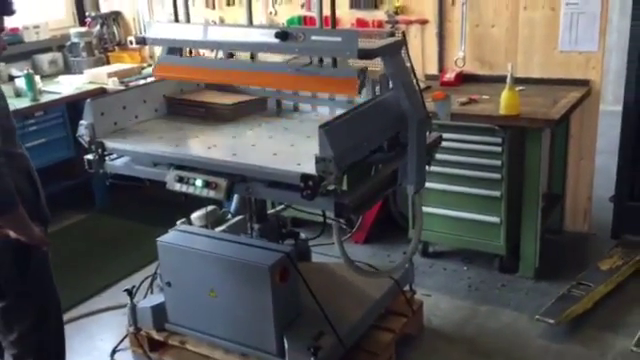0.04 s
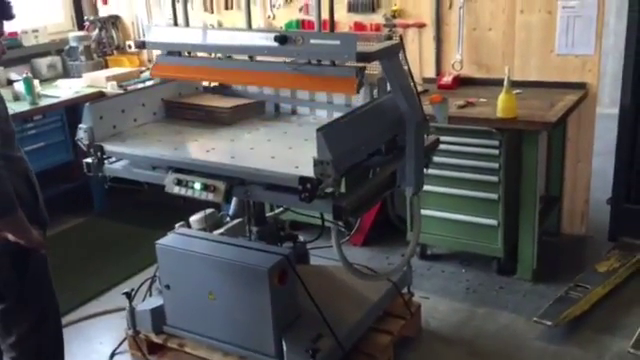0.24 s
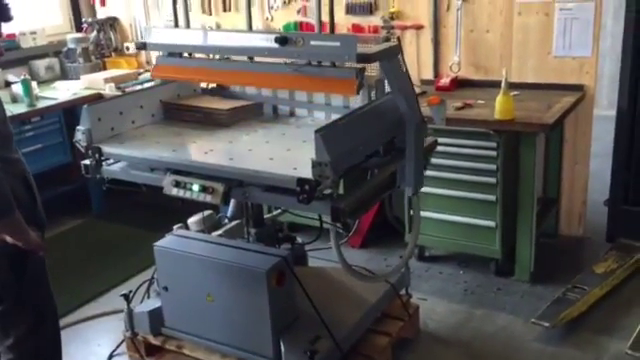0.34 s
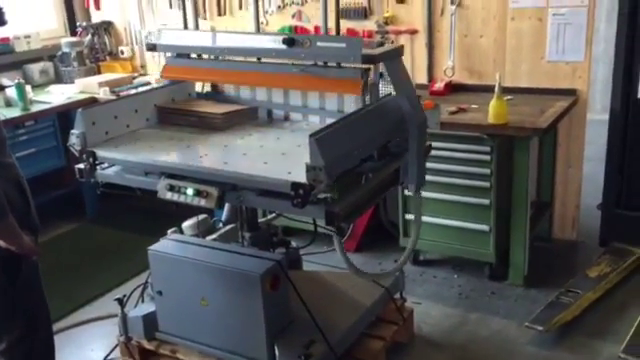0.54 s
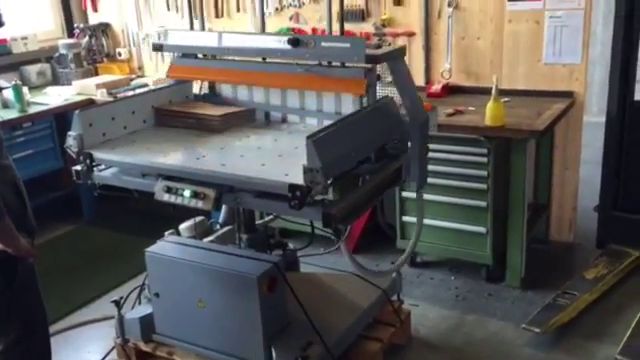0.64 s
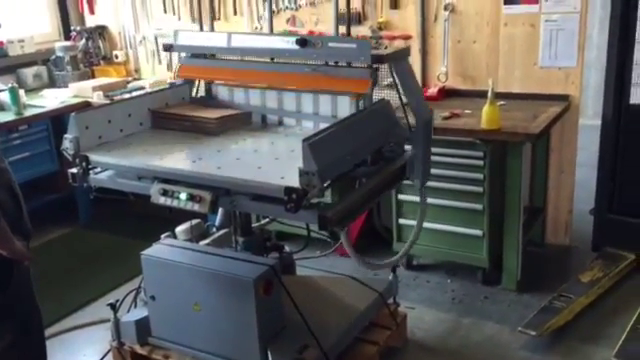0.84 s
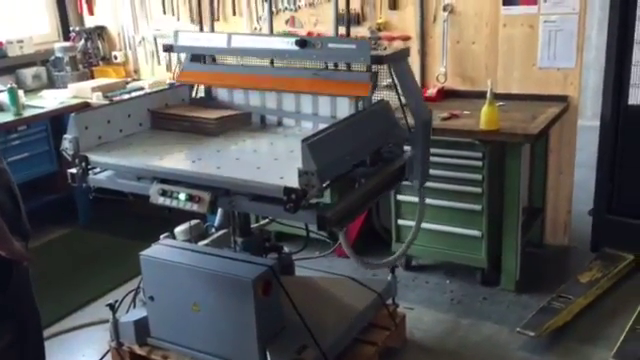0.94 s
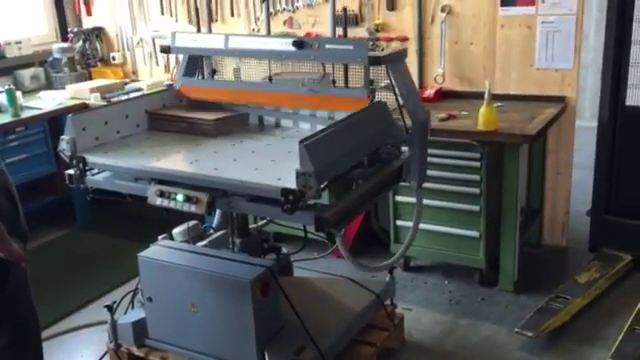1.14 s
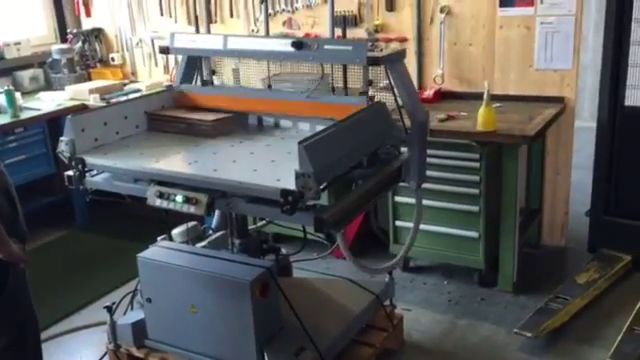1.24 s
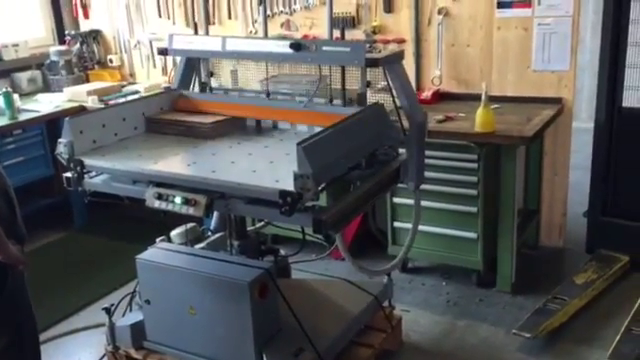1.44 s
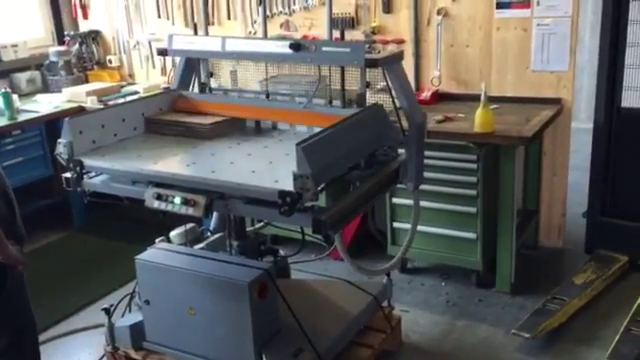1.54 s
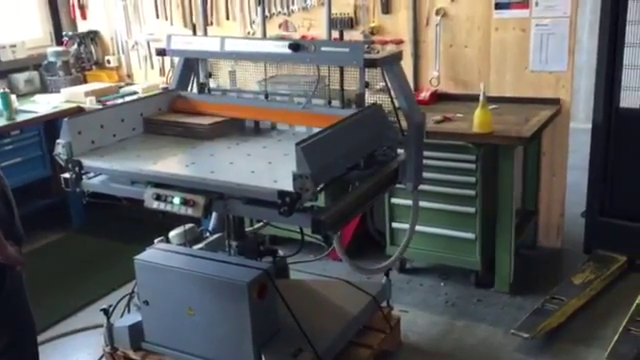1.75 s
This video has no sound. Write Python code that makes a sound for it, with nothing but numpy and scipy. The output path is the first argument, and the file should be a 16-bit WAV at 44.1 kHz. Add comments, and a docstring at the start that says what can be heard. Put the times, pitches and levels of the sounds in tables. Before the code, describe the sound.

An air-driven machine clanks and rattles at about 0.2 seconds, its steel frame ringing. Compressed air hisses with faint whistles, and a thin squeal comes near 0.8. Just before 1 second a valve snaps and a hard metal bang rings out, followed by venting air and a low wavering drone. More snaps and knocks come around 1.4 to 1.5. A steady whir runs throughout in the small workshop.

```python
"""A paper jogging machine in a small workshop. Its air-driven mechanism clanks in; air hisses and
whistles and a seal squeals while the cylinder travels. A valve snaps, the press beam is set off with
a bang and sinks with a low drone as air vents, then a second valve snaps. The steel frame rings and
the room holds each blow over a steady whir."""
import sys
import numpy as np
from scipy import signal
from scipy.fft import rfft, irfft
from scipy.io import wavfile

SR = 44100
rng = np.random.default_rng(int(sys.argv[2]) if len(sys.argv) > 2 else 0)


def file_out(sig):
    """Save sig as 16-bit WAV at sys.argv[1]."""
    # one column per channel
    cols = np.atleast_2d(sig).T
    # limit, then scale
    lim = np.clip(cols, -1, 1)
    pcm = np.round(lim * 32767).astype(np.int16)
    wavfile.write(sys.argv[1], SR, pcm)


N = 79380


def undb(db):
    """dB to gain."""
    return 10 ** (np.asarray(db) / 20)


def seconds():
    """Sample times."""
    return np.arange(N) / SR


def bins_hz():
    """FFT bin frequencies, at least 1 Hz."""
    return np.maximum(np.fft.rfftfreq(N, 1 / SR), 1)


def curve(rows, column=1):
    """Table column, linear in time."""
    rows = np.array(rows)
    return np.interp(seconds(), rows[:, 0], rows[:, column])


def at_pitch(rows, hz):
    """Table value, linear in log frequency."""
    rows = np.array(rows)
    return np.interp(np.log(hz), np.log(rows[:, 0]), rows[:, 1])


def noise(gain):
    """Random-phase noise shaped by a gain per bin, rms 1."""
    x = irfft(gain * np.exp(2j * np.pi * rng.random(N // 2 + 1)), N)
    return x / np.sqrt(np.mean(x ** 2))


def drift(rate_hz):
    """Slow random drift, rms 1."""
    return noise(np.exp(-(bins_hz() / rate_hz) ** 2 / 2))


def resonance(centre_hz, width_hz):
    """Noise in one resonance."""
    return noise(1 / (1 + ((bins_hz() - centre_hz) / (width_hz / 2)) ** 2))


def flow(colour, flutter_db, flutter_hz):
    """Coloured noise, fluttering in level."""
    return noise(undb(at_pitch(colour, bins_hz()))) * undb(flutter_db * drift(flutter_hz))


def fade(t, t60_s):
    """Exponential decay."""
    return np.exp(-np.log(1000) * t / t60_s)


def walls(x, echo_db=-3, count=8, delay_s=(.002, .022), low_cut_hz=600):
    """Early reflections from floor, benches and walls add a fine, constant colour."""
    lags = (rng.uniform(*delay_s, count) * SR).astype(int)
    upper = irfft(rfft(x) * bins_hz() / (bins_hz() + low_cut_hz), N)
    echoes = sum(np.concatenate([np.zeros(lag), upper])[:N] for lag in lags) / np.sqrt(count)
    return (x + undb(echo_db) * echoes) / np.hypot(1, undb(echo_db))


def whir(level_db=-39):
    """Steady whir of the workshop."""
    colour = [(25, -30), (50, -13), (110, -4.5), (200, 2), (330, 0), (550, -5), (760, 0.5), (1150, 3.5),
              (1500, -8), (1750, -1), (2100, -12.5), (2450, -6.5), (3200, -16.5), (4200, -14),
              (5400, -26.5), (7000, -25), (11000, -31)]  # spectrum: f/Hz, relative level/dB
    return undb(level_db) * flow(colour, flutter_db=-0.1, flutter_hz=28)


def air_hiss():
    """Compressed air feeds the cylinder, then vents as the beam sinks."""
    # spectra: f/Hz, relative level/dB
    feed_colour = [(150, -4.5), (500, -6), (1100, 1), (1450, -1), (1850, 4.5), (2400, -6.5), (3000, -3.5),
                   (4000, -3.5), (5400, -8.5), (6800, -6), (7800, -12.5), (9200, -6), (11000, -26.5)]
    vent_colour = [(150, -17), (500, 0), (1100, 1), (1500, -0.5), (2100, 1), (2800, -3.5), (4200, -2.5),
                   (4900, -10), (6500, -5), (7700, -8), (8800, -3), (11000, -15)]
    # envelopes: t/s, level/dB
    feed_level = [(.19, -72), (.22, -45), (.42, -35.5), (.55, -36.5), (.65, -34), (.78, -34.5), (.88, -37),
                  (.96, -32), (1.05, -76)]
    vent_level = [(.9, -83), (.93, -32.5), (1.1, -36.5), (1.28, -37), (1.42, -34), (1.6, -35.5),
                  (1.8, -37.5)]
    feed = flow(feed_colour, flutter_db=0.56, flutter_hz=13) * undb(curve(feed_level))
    vent = flow(vent_colour, flutter_db=1.05, flutter_hz=22) * undb(curve(vent_level))
    return feed + vent


def whistles(gain_db=-3, waver_db=2, fade_s=0.033):
    """Narrow passages in the air lines whistle unsteadily."""
    tones = [(.3, .87, 1830, 70, -44), (.35, .87, 2930, 50, -50), (.44, .6, 4920, 110, -46.5),
             (.72, .83, 4925, 110, -46), (.33, .87, 6710, 80, -47), (.3, .85, 9080, 130, -51),
             (1.15, 1.75, 4270, 80, -50)]  # start/s, end/s, f/Hz, width/Hz, relative level/dB
    out, t = np.zeros(N), seconds()
    for start_s, end_s, hz, width_hz, db in tones:
        gate = np.clip(np.minimum(t - start_s, end_s - t) / fade_s + .5, 0, 1)
        out += undb(db + gain_db + waver_db * drift(5.3)) * gate * resonance(hz, width_hz)
    return out


def seal_squeal(pitch_hz=1820, waver=0.0044):
    """The cylinder's seal sticks and slips: a brief, thin, wavering tone."""
    level = [(.64, -70), (.69, -49), (.77, -35), (.81, -48), (.87, -68)]  # envelope: t/s, level/dB
    phase = 2 * np.pi * np.cumsum(pitch_hz * (1 + waver * drift(40))) / SR
    return np.sqrt(2) * undb(curve(level)) * np.sin(phase)


def beam_drone(rough_db=2.9):
    """Wavering low hum and its octave, strongest while the beam sinks."""
    track = [(.08, 101.8, -73, -68), (.14, 101, -57, -49), (.55, 94, -64, -56), (.72, 98.14, -60, -49.5),
             (.87, 99.6, -65, -51.5), (.97, 99.6, -67, -50), (1.0, 97.1, -60, -38), (1.04, 98.3, -44, -34),
             (1.075, 96.6, -43.5, -49), (1.13, 90.7, -57, -40), (1.18, 100, -44, -36),
             (1.21, 108.6, -46, -42.5), (1.32, 99.4, -58, -58), (1.48, 96.2, -46, -46),
             (1.58, 102.7, -68, -56), (1.8, 102, -62, -62)]  # t/s, f/Hz, fundamental level/dB, octave level/dB
    phase = 2 * np.pi * np.cumsum(curve(track, column=1)) / SR
    fundamental = undb(curve(track, column=2) + rough_db * drift(25)) * np.sin(phase)
    octave = undb(curve(track, column=3) + rough_db * drift(22)) * np.sin(2 * phase)
    return np.sqrt(2) * (fundamental + octave)


def panel_knocks():
    """Panels and loose parts knock, each at one pitch."""
    knocks = [(0.206, -27.5, 187, 70, 0.42), (.263, -19, 1950, 260, 0.2), (1.433, -37.5, 101, 50, 0.28),
              (1.436, -30, 1880, 160, 0.25), (1.504, -30, 1175, 160, 0.17)]  # t/s, level/dB, f/Hz, width/Hz, t60/s
    t = seconds()
    return sum(undb(db) * resonance(hz, width_hz) * (t >= start_s) * fade(abs(t - start_s), t60_s)
               for start_s, db, hz, width_hz, t60_s in knocks)


def strike(blows, colour, ring_times, body, crack_db, crack_s, modes_db, attack_s, build_cycles=2.3):
    """Per blow: a short crack, a dense ring of panels and room dying by band, and the body's modes."""
    out, hz, t = np.zeros(N), bins_hz(), seconds()[:SR]

    def envelope(f_hz, t60_s):
        """Low tones build up more slowly."""
        return (1 - np.exp(-t * f_hz / build_cycles)) * fade(t, t60_s)

    centres_hz = np.geomspace(40, 12000, 10)
    bands = [np.interp(np.log(hz), np.log(centres_hz), row) for row in np.eye(len(centres_hz))]
    decays = [envelope(f, at_pitch(ring_times, f)) for f in centres_hz]
    modes = np.array([undb(db) * envelope(f, t60_s) * np.exp(2j * np.pi * f * t)
                      for f, db, t60_s in body])
    contact = (1 - np.exp(-t / attack_s)) * (1 + undb(crack_db) * np.exp(-t / crack_s))
    for start_s, db, tilt in blows:
        spectrum = rfft(noise(undb(at_pitch(colour, hz) + tilt * np.log2(hz))))
        dense = sum(irfft(spectrum * band, N)[:SR] * decay for band, decay in zip(bands, decays))
        phasors = np.exp(2j * np.pi * rng.random((len(body), 1)))
        ring = (phasors * modes).imag.sum(axis=0)
        blow = undb(db) * contact * (dense + undb(modes_db) * ring)
        first = int(start_s * SR)
        out[first:first + SR] += blow[:N - first]
    return out


def valve_snaps(gain_db=-0.5):
    """Air valves and their linkage snap; the valve block rings."""
    blows = [(.9225, -23.5, 0.5), (1.384, -33, -2.5), (1.434, -22.5, 0.5), (1.446, -29.5, -2),
             (1.504, -31.5, -2.5)]  # t/s, relative level/dB, tilt/(dB/octave)
    colour = [(40, -7), (95, -6), (200, 0), (600, -7.5), (1400, -1), (1850, 3.5), (2500, -4.5),
              (3300, -9.5), (4050, -3.5), (5000, -9), (6700, -6), (8000, -10.5), (11000, -16.5)]  # spectrum: f/Hz, relative level/dB
    ring_times = [(100, 0.2), (1500, 0.26), (4000, 0.48), (10000, .3)]  # in the room: f/Hz, t60/s
    block_modes = [(102.5, -6, .6), (1750, 6, 0.23), (1890, 2, 0.22), (1930, 4.5, 0.19), (3985, 7, 0.16),
                   (4160, -2, 0.16), (4640, 3.5, .2), (6990, -8, .15)]  # f/Hz, relative level/dB, t60/s
    return undb(gain_db) * strike(blows, colour, ring_times, block_modes,
                                  crack_db=-9.5, crack_s=0.0057, modes_db=-12.5, attack_s=0.00094)


def frame_clanks(gain_db=-4.5):
    """The mechanism engages and rattles; the steel frame rings."""
    blows = [(.194, -17.5, 1.3), (.2005, -17.5, -1.5), (.211, -31, -3.5), (.220, -21.5, 1), (.263, -25, 0),
             (.322, -28.5, -1)]  # t/s, relative level/dB, tilt/(dB/octave)
    colour = [(40, -31), (80, -14), (190, 0.5), (400, -5.5), (750, -2), (1250, -1), (2200, -3),
              (3300, -3.5), (4200, -7.5), (5300, -13), (6200, -8.5), (8000, -19), (9300, -11.5),
              (11000, -30)]  # spectrum: f/Hz, relative level/dB
    ring_times = [(100, 0.99), (400, 0.33), (1500, 0.83), (3500, 0.53), (6000, 0.39), (10000, 0.4)]  # in the room: f/Hz, t60/s
    frame_modes = [(75.4, -18, .9), (163, -4, .65), (194, 0, .55), (232, -3, .4), (307, -11, .6),
                   (733, -7, .5), (1148, -3, .5), (1250, 1, .42), (1870, -1, .38), (1966, -5, .5),
                   (2400, -7, .55), (2532, -2, .33), (2636, -1, .33), (3130, -2, .3), (3292, -1, .3),
                   (4665, -7, .25)]  # f/Hz, relative level/dB, t60/s
    return undb(gain_db) * strike(blows, colour, ring_times, frame_modes,
                                  crack_db=3.5, crack_s=0.011, modes_db=-8.5, attack_s=0.00091)


def beam_bang(gain_db=-7):
    """The press beam is set off with a cluster of hard blows and rings."""
    blows = [(.960, -18, 1.8), (.964, -19, -1.5), (.973, -20, -0.5), (1.003, -26.5, -3.5), (1.079, -31, -3)]  # t/s, relative level/dB, tilt/(dB/octave)
    colour = [(40, -13.5), (100, -12.5), (200, -6), (450, -9.5), (750, -3), (1020, 1.5), (1350, 3),
              (1700, -1.5), (2300, -1), (3200, -7), (4600, -14.5), (6600, -7.5), (8000, -12), (11000, -24)]  # spectrum: f/Hz, relative level/dB
    ring_times = [(100, 2.2), (400, 0.47), (1500, 0.77), (3000, 0.79), (5000, .25), (10000, 0.16)]  # in the room: f/Hz, t60/s
    beam_modes = [(197, -1, .7), (704, -1, .25), (871, -2, .3), (936, -1, .3), (1035, 0, .22),
                  (1063, -4, .4), (1591, -3, .35), (1621, -4, .4), (1692, -3, .5), (1746, -3, .45),
                  (1868, -2, .35), (3135, -5, .4), (6600, -2, .12)]  # f/Hz, relative level/dB, t60/s
    return undb(gain_db) * strike(blows, colour, ring_times, beam_modes,
                                  crack_db=10.5, crack_s=0.0047, modes_db=-7.5, attack_s=0.0004)


def scene():
    """The machine over the workshop's whir, mono."""
    background = walls(whir() + air_hiss() + whistles())
    impacts = frame_clanks() + beam_bang() + valve_snaps() + panel_knocks()
    return (background + impacts + seal_squeal() + beam_drone())[None]


def record(dry):
    """Bass cut and steep top cut."""
    low_hz, top_hz = 38, 10650
    thinned = signal.sosfilt(signal.butter(4, low_hz, "high", fs=SR, output="sos"), dry)
    return signal.sosfilt(signal.ellip(10, .2, 80, top_hz, fs=SR, output="sos"), thinned)


dry = scene()
out = record(dry)
file_out(out)
```